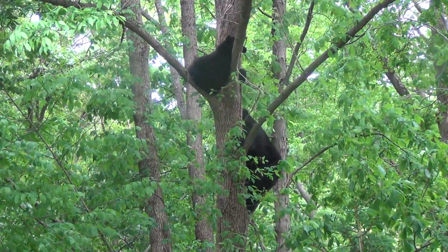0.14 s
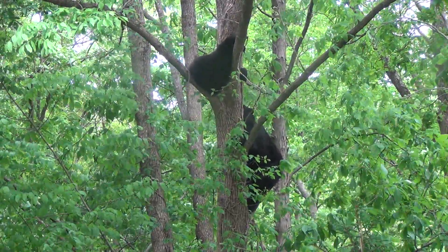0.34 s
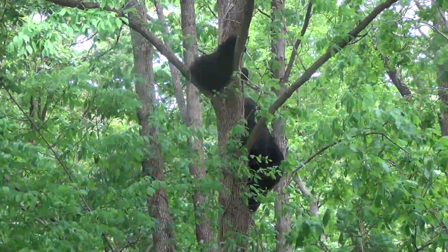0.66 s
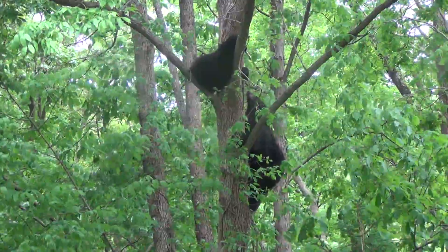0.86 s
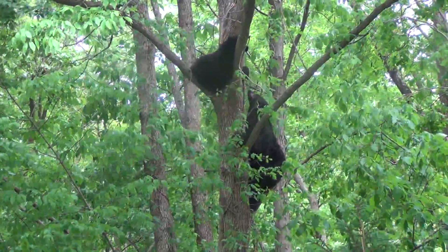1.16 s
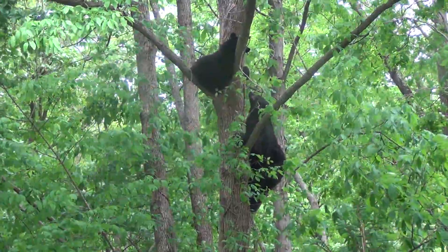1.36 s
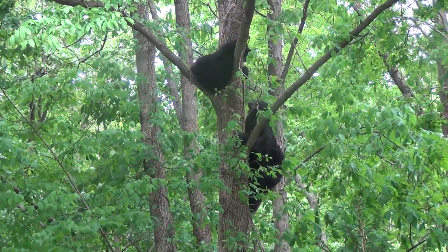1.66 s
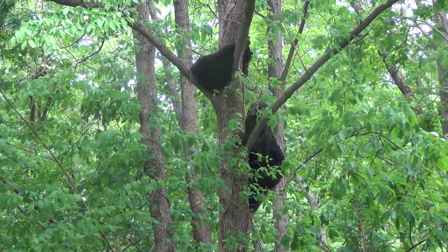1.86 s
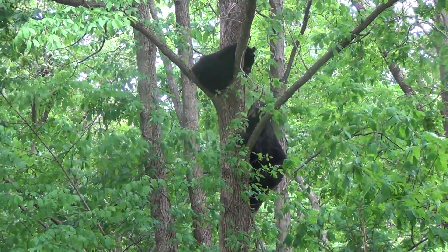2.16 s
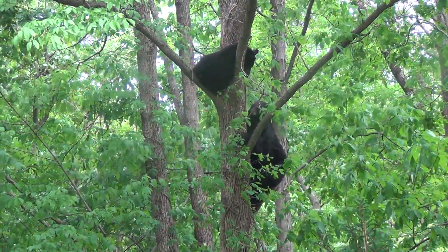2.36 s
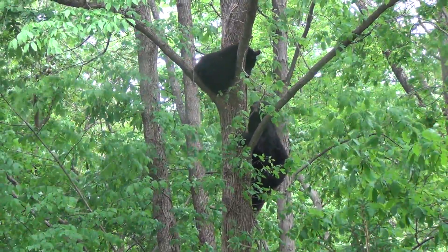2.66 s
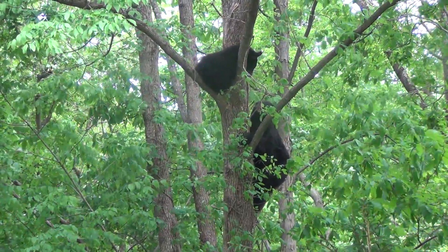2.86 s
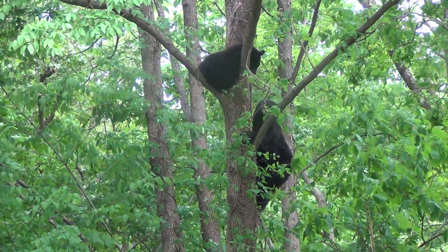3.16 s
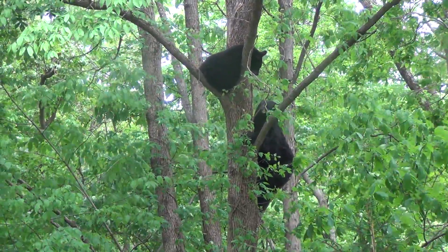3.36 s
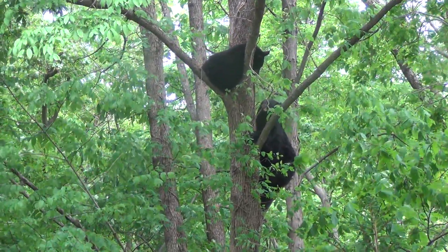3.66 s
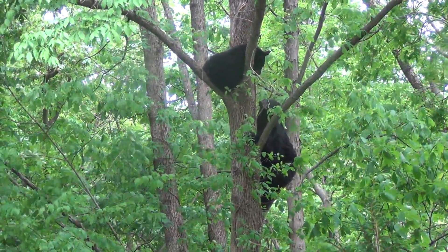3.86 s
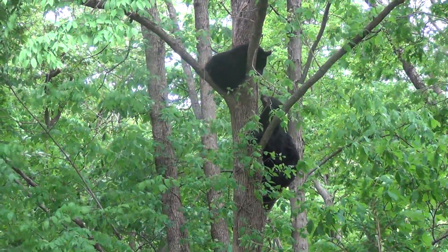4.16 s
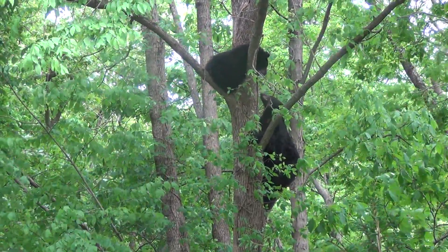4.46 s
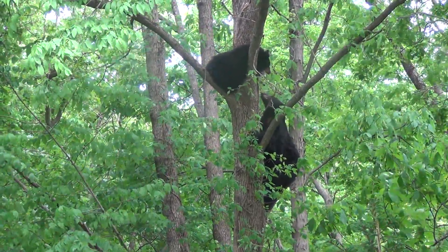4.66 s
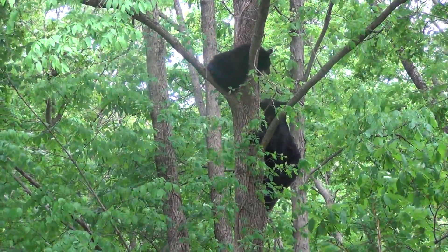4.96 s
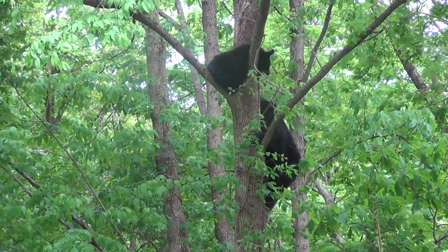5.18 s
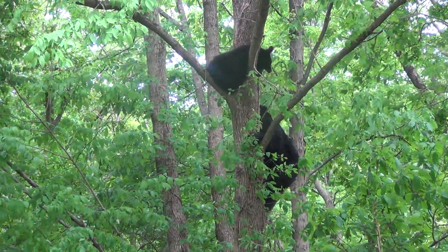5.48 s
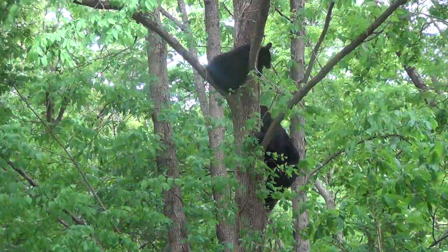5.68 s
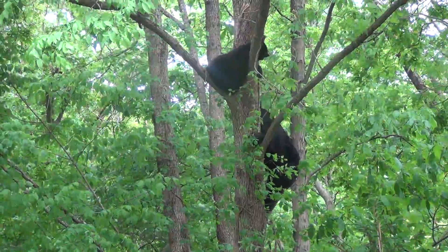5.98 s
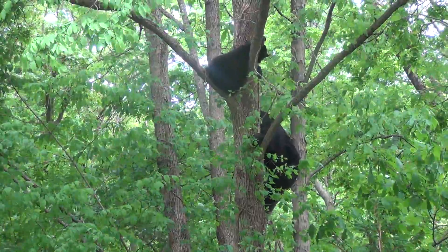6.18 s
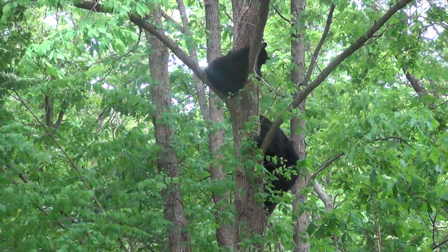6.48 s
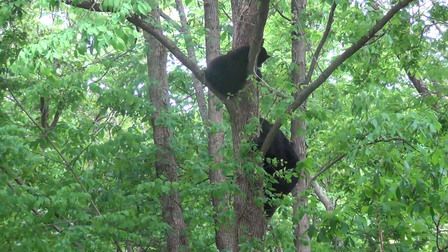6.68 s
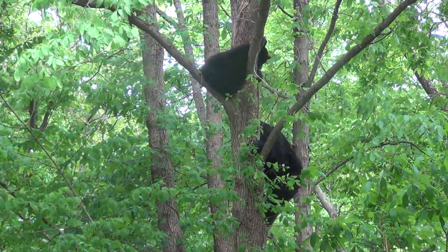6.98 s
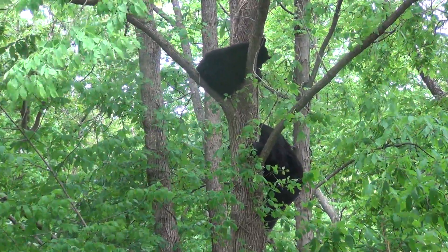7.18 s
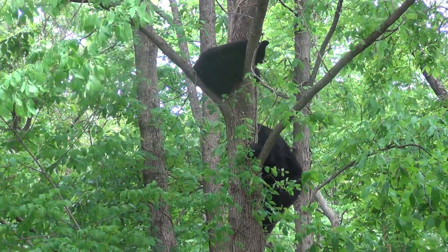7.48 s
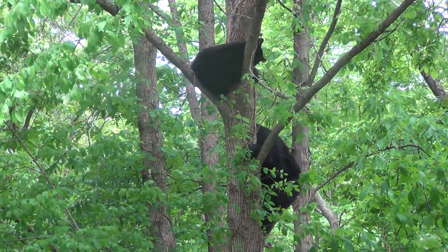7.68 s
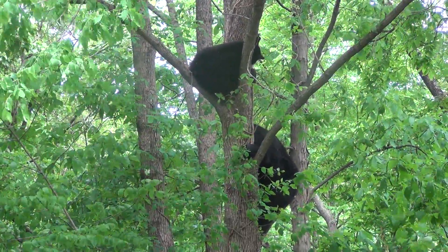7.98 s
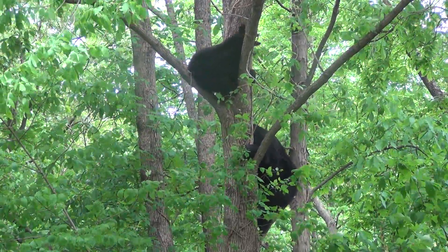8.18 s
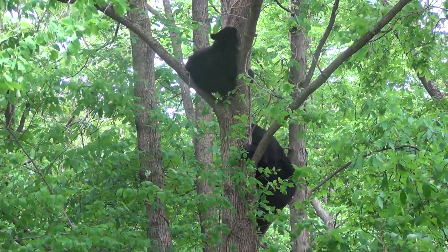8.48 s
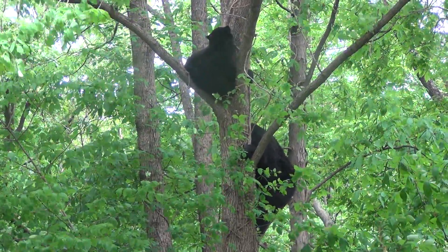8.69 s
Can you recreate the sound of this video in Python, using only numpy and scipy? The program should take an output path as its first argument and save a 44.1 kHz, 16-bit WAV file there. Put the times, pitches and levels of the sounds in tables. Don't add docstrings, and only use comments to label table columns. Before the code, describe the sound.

A leafy wood with faint hiss, soft wind and a distant hush, heard through a handheld camera microphone. From 0.1 s a large dog, left of centre, barks with a ringing, slightly rough voice: at about 0.1, 0.5, 1.05, 1.4, 2.0, 2.9, 3.3, 4.0, 4.8, 5.25 and 5.8 s, each short with an echo off the trunks. Leaves rustle throughout; a low knock and short snaps come around 1.3 s, a thin branch squeak at 2.1, more twig cracks at 4.7 and 5.5-5.7. Animal gasps start at 5.5 s. Foliage shakes strongly around 6.2-6.4 as a hound-like voice on the right bays hoarsely, again at 6.65, then moans unsteadily from 7.0 to 7.9 with a low chest hum. The loudest bark hits at 7.9; gasps and a sinking moan follow, 8.3-8.8. Loud peaks bring small clicks and drops in level.

```python
import sys
import numpy as np
from scipy import signal
from scipy.fft import rfft, irfft, next_fast_len
from scipy.io import wavfile
from scipy.ndimage import uniform_filter1d, minimum_filter1d

SR = 44100
rng = np.random.default_rng(int(sys.argv[2]) if len(sys.argv) > 2 else 0)


def ratio(d):
    e = np.asarray(d, float) / 20
    return 10 ** e


def log_audio(samples):
    frames = np.atleast_2d(samples).T
    limited = np.clip(frames, -1, 1)
    pcm = np.round(limited * 32767).astype(np.int16)
    wavfile.write(sys.argv[1], SR, pcm)


N = 389844

# freq_hz, level_db_per_hz
AIR_SPECTRUM = [(30, -20), (60, 1.5), (125, -4.5), (400, 11), (800, 1.5), (1400, -4), (2200, -12.5),
                (4000, -12), (8500, -13.5), (10500, -15), (16000, -20)]
# freq_hz, likeness_0_1
STEREO_LIKENESS = [(30, 0.088), (125, 0.87), (500, 0.97), (3000, 1), (6000, 0.88), (9000, 0.71),
                   (12000, .99)]
# freq_hz, level_db
WHINE = (15734, -77)
# crest_s, rise_s, level_db, fall_db_per_s
GUSTS = [(0.068, 0.11, -54.5, 199), (0.361, .15, -60, 14), (1.12, 0.059, -59.5, 25),
         (1.38, 0.26, -45.5, 66), (2.16, 0.14, -58, 46), (3.25, 0.1, -53.5, 157), (4.07, 0.09, -59, 51),
         (5.6, .15, -57, 26.5)]
# freq_hz, level_db_per_hz
WIND_SPECTRUM = [(20, -9), (60, -3.5), (120, 1), (250, 0.5), (450, -32.5)]
WIND_SIDES = [
    [1.2],
    [.8],
]
# crest_s, rise_s, effort_db, crest_second_harmonic_hz, side_tone_db (re effort)
BARKS = [(0.122, 0.097, -14.5, 641.5, -8), (0.478, 0.11, -17.5, 601.5, 1.5), (1.054, 0.089, -15, 630, -4),
         (1.41, .11, -18, 590, 3), (2.01, 0.082, -15, 629, -5), (2.876, 0.091, -15, 629.3, -8),
         (3.288, 0.11, -17.5, 591.7, 4), (3.96, .1, -15.5, 631.6, -5), (4.796, .09, -15, 627, -4.5),
         (5.254, 0.11, -17, 606.3, -1), (5.775, .1, -13.5, 605.3, -3.5), (7.93, 0.054, -9.5, 640, 4)]
RAGGED_BARKS = {3: (.8, 470)}
# freq_hz, width_hz, level_db
BARK_THROAT = [(290, 420, -12), (495, 160, -4), (751.7, 37, -11)]
# freq_hz, width_hz, level_db
BARK_MOUTH = [(1013, 138, 5), (1185, 560, -9.5), (1894, 310, -11), (1390, 760, -21.5), (4240, 420, -14),
              (6000, 390, -23.5), (7980, 540, -22)]
# freq_hz, t60_s
WOOD_T60 = [(200, 0.75), (400, 0.72), (620, 0.6), (1400, 0.87), (3700, 0.64), (9000, 0.13)]
# crest_s, rise_s, rustle_db, fall_db_per_s, dry_leaves_db (re rustle)
SHAKES = [(0.55, 0.23, -60.5, 35, 4), (1.3, .25, -49, 34.5, -8.5), (1.6, 0.18, -52.5, 51, -11.5),
          (1.9, .07, -46.5, 60, 0), (2.16, 0.06, -59.5, 116, 0), (4.15, 0.052, -58, 57, -6),
          (4.76, 0.031, -46, 77, 1), (5.56, .05, -46.5, 38.5, 1.5), (6.08, .12, -50.5, 52, -2.5),
          (6.251, .06, -45, 13, 0.5), (6.41, 0.095, -41.5, 57.5, -4), (6.7, .1, -54.5, 30.5, 7),
          (6.9, 0.45, -53, 111, 6), (7.95, 0.064, -46, 14, -1), (8.45, 0.13, -57, 12, 6.5),
          (8.84, 0.038, -52, 50, -21)]
# freq_hz, level_db_per_hz
FOLIAGE_SPECTRA = [
    [(1500, -14), (2200, -6), (3000, -5.5), (5000, -11), (7000, -28.5), (10000, -46.5)],
    [(4000, -8), (6000, -2.5), (8000, -1.5), (9500, -12.5), (11000, -35), (15000, -34.5)],
    [(200, -40.5), (500, 5), (1100, 6.5), (1600, -0.5), (2200, -3.5), (3000, -48)],
]
# rustle_db, dry_leaves_db, boughs_db
STILL_DB = (-69, -76.5, -63)
# rustle_db, dry_leaves_db, boughs_db (re effort)
BARK_STIR_DB = (-59, -44, -35.5)
# start_s, peak_db, centre_hz, t60_s, broad_crackle_db
SNAPS = [
    (0.551, -40, 1820, 0.045, -6),
    (1.079, -41, 4500, .02, -1),
    (1.34, -29, 340, .8, -38),
    (1.834, -31.5, 1270, 0.094, -15.5),
    (4.731, -30, 1760, 0.091, -37),
    (5.515, -43.5, 2150, 0.23, 0.5),
    (5.678, -37, 1990, .15, -12.5),
]
# start_s, peak_db, centre_hz, t60_s, broad_crackle_db
STICKS = [
    (1.275, -33, 1750, 0.11, -36),
    (5.679, -29.5, 1310, 0.32, -27),
]
# time_s, level_db, pitch_hz
SQUEAK = [
    (2.091, -71, 1163),
    (2.12, -55, 1316),
    (2.15, -55, 1307),
    (2.18, -56, 1300),
    (2.219, -62, 1063),
    (2.27, -73, 790),
]
# freq_hz, level_db
SQUEAK_SPECTRUM = [(4000, -20), (6000, -7), (8000, 0), (9500, -4), (11000, -9), (12500, -10), (14000, -28)]
# crest_s, rise_s, level_db, fall_db_per_s
GASPS = [(5.52, .006, -35.5, 30), (5.71, 0.042, -34, 298), (6.08, 0.15, -39, 183), (7.93, 0.09, -39.5, 47),
         (8.32, 0.027, -39, 329), (8.48, .1, -45, 303)]
# freq_hz, width_hz, level_db
GASP_TRACT = [(1970, 370, 2.5), (2940, 1300, -6), (3960, 400, -17.5), (8200, 900, -17.5)]
# time_s, effort_db, pitch_hz, throat_hz, mouth_db (re effort)
BAYS = [
    [(6.18, -44.5, 328.7, 545, -15.5), (6.225, -15.5, 353.2, 595, -20), (6.272, -19.5, 340.2, 730, 0),
     (6.31, -19.5, 362.5, 718, -7.5), (6.48, -18, 362, 707, -5), (6.56, -38, 360, 650, -26.5)],
    [(6.65, -19.5, 380.5, 526, -17), (6.696, -16, 338.1, 690, -3), (6.76, -17, 360, 667, -10.5),
     (6.92, -16, 355.6, 595, -16), (6.98, -9.5, 337.6, 592, -34.5), (7.04, -25.5, 349, 583, -35.5)],
]
# time_s, effort_db, pitch_hz, throat_hz, mouth_db (re effort)
MOANS = [
    [(7.02, -19, 348.5, 576, -40.5), (7.19, -20.5, 305.5, 586, -48), (7.25, -12.5, 346, 577, -44),
     (7.35, -21, 298.7, 523, -35), (7.42, -16.5, 295.9, 582, -37.5), (7.47, -15.5, 348.3, 572, -48),
     (7.62, -20.5, 331, 540, -35), (7.68, -15, 297, 600, -30), (7.88, -20.5, 362, 550, -43)],
    [(8.29, -23.5, 377.8, 615, -10), (8.334, -10.5, 367.3, 626, -27.5), (8.43, -14, 345.2, 617, -22),
     (8.51, -16, 309.6, 557, -29.5), (8.58, -19, 336.5, 570, -35), (8.63, -16, 345, 680, -31.5),
     (8.73, -16, 331.1, 667, -47), (8.77, -19.5, 320.7, 485, -41), (8.84, -19.5, 290, 470, -37)],
]
# crest_s, level_db, half_width_s
SURGES = [(6.7, -1.5, .017), (7.0, 10, 0.021), (7.236, 5.5, .02), (7.462, 8.5, .015), (7.511, 6, .015),
          (7.735, 5.5, 0.012), (8.39, 1.5, .03), (8.625, 9, .028), (8.7, 5, .028)]
# freq_hz, width_hz, level_db
BAY_CHEST = [(307.6, 23, -17.5), (463, 210, -6), (837, 82, -14)]
# freq_hz, width_hz, level_db
BAY_MOUTH = [(1051, 340, 0.5), (1255, 122, -2), (1469, 71, -12), (2064, 280, -10.5)]
# freq_hz, width_hz, level_db
BAY_NOSE = [(1710, 170, -35), (2310, 110, -48.5), (3200, 200, -53.5), (4510, 290, -42), (4904, 230, -38.5),
            (5830, 640, -37.5), (8700, 500, -50)]
# freq_hz, width_hz, level_db (re effort)
YELP = [(2117, 150, -18)]
# crest_s, rise_s, level_db, fall_db_per_s
RUMBLE = (8, 1.02, -44.5, 2.5)
# freq_hz, level_db_per_hz
RUMBLE_SPECTRUM = [(20, -25), (60, -12), (120, 6), (200, 12.5), (350, -33.5)]
RUMBLE_SIDES_DB = [
    [0.5],
    [6],
]
# time_s, drop_db
GAIN_STEPS = [(6.256, 3), (6.409, 2.2), (6.7, 1.9), (6.78, 1.2), (7.001, 1.6), (7.032, .8), (7.233, 1.7),
              (7.457, 1.2), (7.509, 1.4), (7.731, 1.7), (8.383, 1.5), (8.625, 1.3), (8.836, .7)]
JOLT_SIDES = [
    [0.31],
    [1.3],
]


def evened(x):
    return x / np.sqrt(np.mean(x ** 2) + 1e-20)


def read(points, hz):
    f, value = np.transpose(points)
    return np.interp(np.log(hz + 1), np.log(f + 1), value)


def unrolled(rows):
    s, *columns = np.transpose(rows)
    t = np.arange(s[0], s[-1], 1 / SR)
    return [np.interp(t, s, c) for c in columns]


def add(mix, s, sound):
    part = mix[round(s * SR):][:len(sound)]
    part += sound[:len(part)]


def wobble(size, hz):
    return evened(signal.lfilter(*signal.butter(2, hz, fs=SR), rng.standard_normal(size)))


def swell(s, rise_s, crest_db, fall_db_per_s):
    t = np.arange(0, N, 128) / SR - s
    start_db = -18
    shape_db = np.where(t < 0, start_db * (t / rise_s) ** 2, -abs(fall_db_per_s) * t)
    return ratio(2 * np.maximum(crest_db + shape_db, -200))


def loudness(power):
    return np.interp(np.arange(N), np.arange(0, N, 128), np.sqrt(power))


def coloured(x, spectrum):
    size = next_fast_len(N)
    gain = ratio(read(spectrum, np.fft.rfftfreq(size, 1 / SR)))
    return evened(irfft(rfft(x, size) * gain, size)[:, :N])


def partly_alike(left, other, hz):
    same = np.clip(read(STEREO_LIKENESS, hz), -1, 1)
    same = same.reshape(-1, *[1] * (left.ndim - 1))
    return np.array([left, same * left + np.sqrt(1 - same ** 2) * other])


def patchy_noise(patchy_db):
    frames = N // 256 + 5
    a, b, c, d, patches = rng.standard_normal((frames, 513, 5)).T
    patches = evened(uniform_filter1d(uniform_filter1d(patches, 12, 0), 12, 1))
    z = partly_alike(a + 1j * b, c + 1j * d, np.fft.rfftfreq(1024, 1 / SR))
    z = z * ratio(patchy_db * patches)
    return signal.istft(z, nperseg=1024, noverlap=768)[1][:, :N]


def cavity(x, modes):
    out = np.zeros(len(x))
    for k, (hz, width_hz, db) in enumerate(modes):
        b, a = signal.iirpeak(hz, hz / width_hz, SR)
        ring = signal.lfilter(b, a, signal.lfilter(b, a, x))
        out += (-1) ** k * ratio(db) * evened(ring)
    return out


def follow(x, hz, width_hz):
    turn = np.exp(2j * np.pi * np.cumsum(hz) / SR)
    r = np.exp(-np.pi * width_hz / SR)
    return evened((turn * signal.lfilter([1], [1, -2 * r, r * r], x / turn)).real)


def band(x, low_hz, high_hz):
    return signal.sosfilt(signal.butter(4, [low_hz, high_hz], "band", fs=SR, output="sos"), x)


def air():
    size = next_fast_len(N)
    left, other = rfft(rng.standard_normal((2, size)))
    white = irfft(partly_alike(left, other, np.fft.rfftfreq(size, 1 / SR)), size)[:, :N]
    return ratio(-51) * coloured(white, AIR_SPECTRUM)


def wind(stir):
    calm_db = -70
    gusts = loudness(ratio(2 * calm_db) + sum(swell(*row) for row in GUSTS))
    return ratio(2.5) * gusts * coloured(stir, WIND_SPECTRUM) * WIND_SIDES


def folds(hz, rough, jitter):
    size = len(hz)
    turns = np.cumsum(hz * (1 + jitter * wobble(size, 60))) / SR
    pulses = sum(np.cos(2 * np.pi * k * turns) for k in range(1, 9))
    pulses = pulses * (1 + .35 * wobble(size, 50))
    puffs = (.5 + np.exp(-(turns % 1) / 0.21)) * rng.standard_normal(size)
    return (1 - rough) * evened(pulses) + 2.6 * rough * evened(puffs)


def bark(rise_s, crest_db, crest_hz, side_db, rough, side_hz):
    fall_s, fall_db_per_s = 0.1274, 98.5
    t = np.arange(-rise_s, fall_s, 1 / SR)
    after = np.maximum(t, 0)
    climb_db = -33 * (np.maximum(-t, 0) / rise_s) ** 1.77
    effort_db = crest_db + climb_db - fall_db_per_s * after
    effort_db = uniform_filter1d(effort_db, size=900)

    onset_hz, drop_s, drop_width_s = 715.3, .035, .012
    sag_hz_per_s, scoop_hz, scoop_s = 260, 130, .018
    high = .5 - .5 * np.tanh((t + drop_s) / drop_width_s)
    second_hz = crest_hz + (onset_hz - crest_hz) * high - sag_hz_per_s * after
    second_hz = second_hz - scoop_hz * np.exp(-(t + rise_s) / scoop_s)
    rough = np.clip(rough + .025 * (effort_db.max() - effort_db), 0, 1)
    drive = folds(second_hz / 2, rough, jitter=.028)

    side_sag_per_s, side_fade_db_per_s = .5, 84
    beat_hz = side_hz * (1 - side_sag_per_s * t + 0.032 * wobble(len(t), 33))
    beat = np.cos(2 * np.pi * np.cumsum(beat_hz) / SR)
    side = (1 - rough) * beat + 7 * rough * rng.standard_normal(len(t))
    side = cavity(side, [(side_hz, 80, 0)])
    side_db = side_db - 8 * high - side_fade_db_per_s * after

    throat = follow(drive, second_hz, 112) + cavity(drive, BARK_THROAT) + ratio(side_db) * side
    mouth_db = -19 + 3 * high
    voice = band(throat, 250, 893) + ratio(mouth_db) * cavity(drive, BARK_MOUTH)
    return ratio(effort_db) * voice * signal.windows.tukey(len(voice), .25)


def wood_tail(x, alike):
    taps = np.zeros((2, SR))
    grid = np.arange(300, SR - 20, 20)
    at = grid + rng.integers(0, 20, (2, len(grid)))
    np.put_along_axis(taps, at, rng.choice([-1., 1.], at.shape), 1)
    taps[1] = alike * taps[0] + np.sqrt(1 - alike ** 2) * taps[1]
    hz, t, z = signal.stft(taps, SR, nperseg=256)
    decay_db = -60 * t / read(WOOD_T60, hz)[:, None]
    tail = signal.istft(z * ratio(decay_db), SR, nperseg=256)[1]
    return signal.oaconvolve(x[None], tail / np.linalg.norm(tail[0]), axes=1)[:, :N]


def barking_dog():
    ways = np.zeros((3, N))
    usual = (.3, 435)  # roughness_0_1, side_tone_hz
    for k, (s, rise_s, *row) in enumerate(BARKS):
        add(ways[k % 3], s - rise_s, bark(rise_s, *row, *RAGGED_BARKS.get(k, usual)))
    dog = sum(way + ratio(-9) * wood_tail(way, alike=.93) for way in ways)
    return dog * ratio([[-1.4], [-4.8]])


def leaves(stir):
    out = 0
    for k, spectrum in enumerate(FOLIAGE_SPECTRA):
        power = ratio(2 * STILL_DB[k])
        for s, rise_s, db, fall_db_per_s, dry_db in SHAKES:
            shade_db = (0, dry_db, 8.5)[k]
            power = power + swell(s, rise_s, db + shade_db, fall_db_per_s)
        for s, _, effort_db, *_ in BARKS:
            power = power + swell(s, .08, effort_db + BARK_STIR_DB[k], 44.5)
        out = out + loudness(power) * coloured(stir, spectrum)
    return ratio(0.1 + 0.93 * wobble(N, 83)) * out


def snaps():
    out, t = np.zeros(N), np.arange(SR // 2) / SR
    for rows, width_share in ((SNAPS, .53), (STICKS, .15)):
        for s, db, hz, t60_s, crackle_db in rows:
            modes = [(hz, width_share * hz, 0), (5000, 5000, crackle_db)]
            wood = cavity(rng.standard_normal(len(t)), modes)
            add(out, s, ratio(db - 60 * t / t60_s) * wood)
    return out


def squeak():
    out = np.zeros(N)
    db, hz = unrolled(SQUEAK)
    hz = uniform_filter1d(hz, size=1300)
    turns = np.cumsum(hz * (1 + .012 * wobble(len(hz), 300))) / SR
    stack = 0
    for k in range(4, 12):
        harmonic_db = read(SQUEAK_SPECTRUM, k * hz) + 3 * wobble(len(hz), 60)
        stack = stack + ratio(harmonic_db) * np.sin(2 * np.pi * k * turns)
    add(out, SQUEAK[0][0], ratio(db) * stack)
    return out


def gasps():
    rush = loudness(sum(swell(*row) for row in GASPS))
    return ratio(-7.5) * rush * cavity(rng.standard_normal(N), GASP_TRACT)


def bay(rows):
    effort_db, hz, throat_hz, mouth_db = unrolled(rows)
    since = np.arange(len(hz)) / SR
    t = since + rows[0][0]
    surge_db = sum(db * np.exp(-((t - s) / half_s) ** 2) for s, db, half_s in SURGES)
    rough = np.interp(mouth_db, [-25, -5], [.52, .33]) - .016 * surge_db
    drive = folds(hz, rough, jitter=.02)

    low = ratio(surge_db) * follow(drive, hz, 140) + cavity(drive, BAY_CHEST)
    throat_db = -0.88 * surge_db + 2.5 * wobble(len(hz), 14)
    low += ratio(throat_db) * follow(drive, throat_hz, 171)
    mouth = ratio(mouth_db) * cavity(drive, BAY_MOUTH)
    nose = ratio(1.5 * wobble(len(hz), 9.8)) * cavity(drive, BAY_NOSE)
    yelp = ratio(mouth_db[0] + 12 - 130 * since) * cavity(drive, YELP)
    voice = band(low, 218, 936) + mouth + nose + yelp
    return ratio(effort_db + 4) * voice * signal.windows.tukey(len(voice), .06)


def baying_hound():
    hound = np.zeros(N)
    for rows in BAYS + MOANS:
        add(hound, rows[0][0], bay(rows))
    return (hound + ratio(-9) * wood_tail(hound, alike=.93)) * ratio([[-2.5], [-.4]])


def chest_rumble(stir):
    return ratio(RUMBLE_SIDES_DB) * loudness(swell(*RUMBLE)) * coloured(stir, RUMBLE_SPECTRUM)


def scene():
    stir = patchy_noise(patchy_db=2.74)
    near = snaps() + gasps()
    near = near + ratio(-4) * wood_tail(near, alike=.96) + squeak()
    dogs = barking_dog() + baying_hound() + chest_rumble(stir)
    return air() + wind(stir) + dogs + leaves(stir) + near


def top_cut(x):
    return signal.sosfilt(signal.butter(12, 16220, fs=SR, output="sos"), x)


def record(dry):
    t = np.arange(N) / SR
    whine_hz, whine_db = WHINE
    dry = dry + ratio(whine_db + 1) * np.sin(2 * np.pi * whine_hz * t)

    down_db, thumps = np.zeros(N), np.zeros(N)
    recovery_db_per_s = 5.4
    for s, db in GAIN_STEPS:
        at = round(s * SR) - 70
        at += np.argmax(abs(dry[1, at:at + 140]))
        down_db[at:] = np.maximum(down_db[at] + db - recovery_db_per_s * (t[at:] - s), 0)
        add(thumps, at / SR, .012 * db * np.hanning(200))
    turned = dry / ratio(uniform_filter1d(down_db, size=4))

    ceiling = .56
    room = minimum_filter1d(ceiling / np.maximum(abs(turned.mean(0)), ceiling), size=441)
    limited = turned * uniform_filter1d(room, size=441)
    return top_cut(limited + thumps * JOLT_SIDES)


dry = scene()
out = record(dry)
log_audio(out)
```